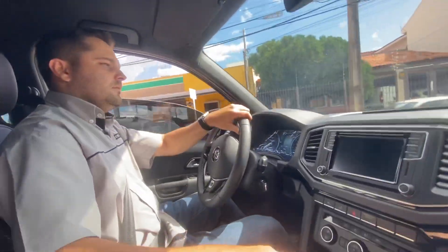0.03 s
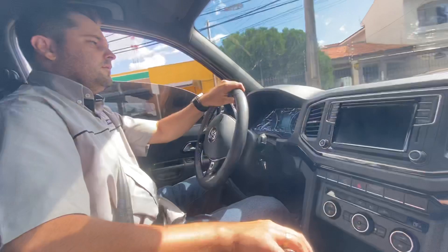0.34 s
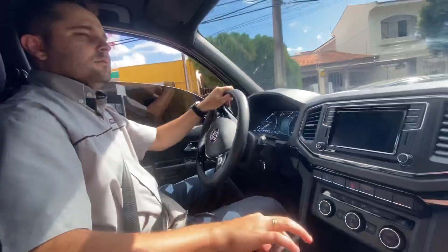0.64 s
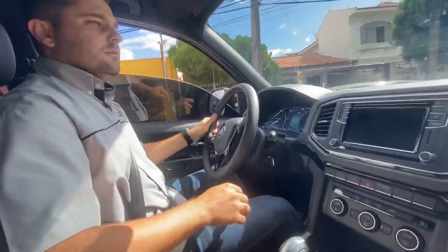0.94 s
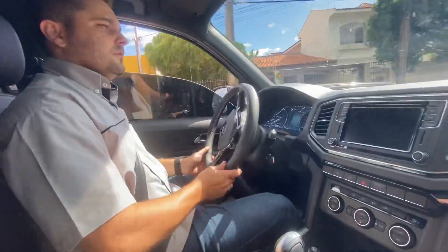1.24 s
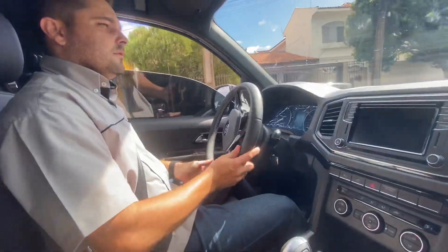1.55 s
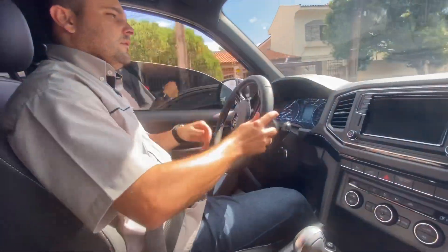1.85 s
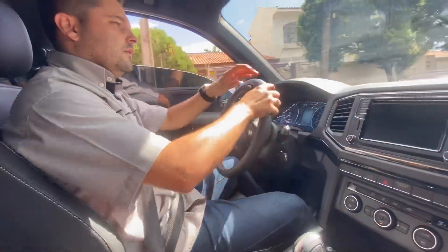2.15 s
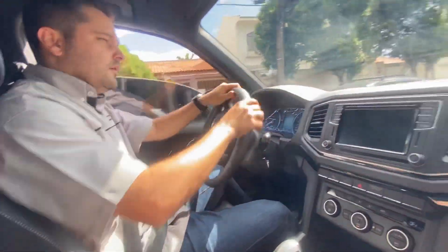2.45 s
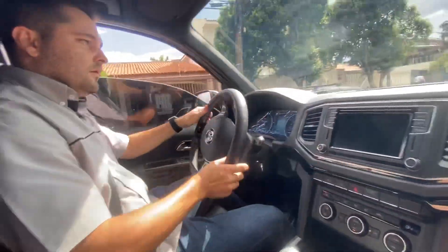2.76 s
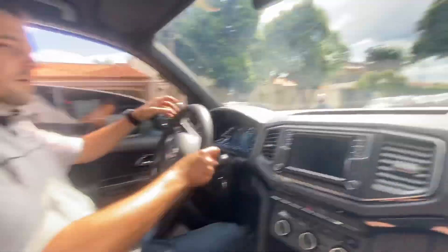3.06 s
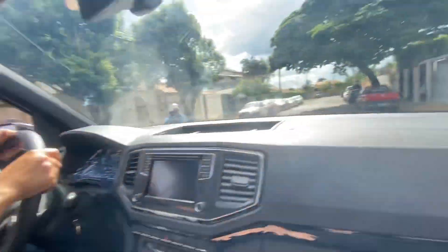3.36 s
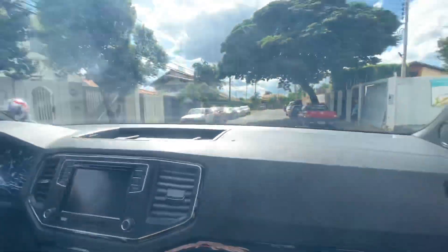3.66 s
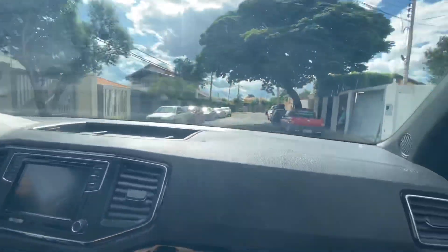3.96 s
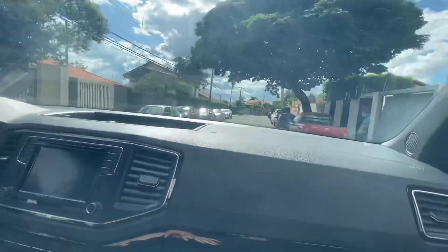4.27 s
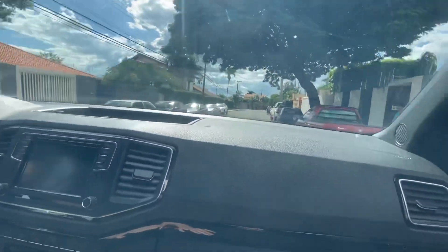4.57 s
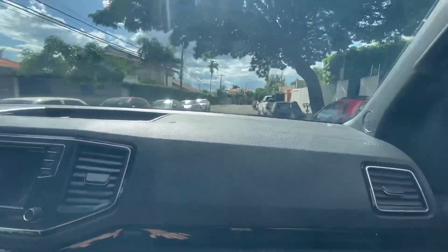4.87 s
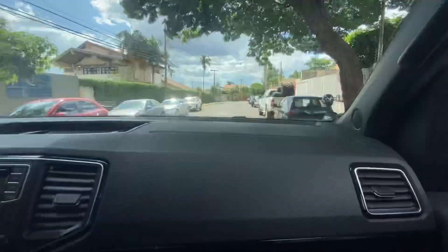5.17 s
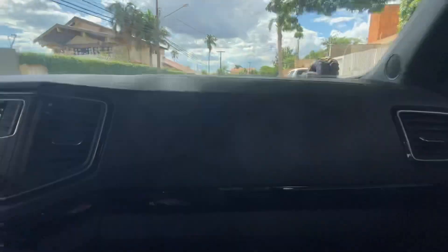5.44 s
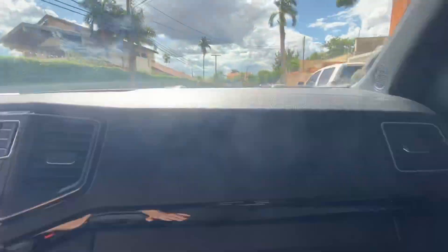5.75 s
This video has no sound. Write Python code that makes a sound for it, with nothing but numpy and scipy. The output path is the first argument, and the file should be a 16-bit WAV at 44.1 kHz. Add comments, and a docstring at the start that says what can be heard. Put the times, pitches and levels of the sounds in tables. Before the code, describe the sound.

Inside a pickup's cab, a diesel engine idles with a low hum and rumble under the steady rush of air vents. Light trim clicks come in the first second or so, the gear lever clacks dryly at about 0.8 seconds, and very faint bird-like chirps follow until 1.4. From about 1.5 seconds the truck pulls away, the engine rising in pitch with diesel clatter and soft turbo hiss. The revs level briefly near 3 seconds, and something loose knocks once at 3.1. From 3.5 the engine pulls hard, with a deep boom in the cab, a raspy exhaust and a growing, wavering roar; a high turbo whoosh glides upward around 4 seconds. It is loudest from 4.5 to 5.3, with a thin whistle and hiss just after 5. Then the throttle lifts, and the engine falls in pitch and softens, still booming at 6 seconds.

```python
"""A low rumble and the hum of an idling V6 diesel, heard inside a pickup with its air vents blowing.
Trim clicks, the gear lever clacks and faint chirps pass; then the truck pulls away, revs out and eases off.
The engine's firings boom in the cab, rasp down the open exhaust and clatter in the engine block.
As it works harder a wavering roar grows and the turbo hisses. Something loose knocks in a turn,
and a thin whistle sounds at the top of the revs."""
import sys
import numpy as np
from scipy import signal
from scipy.fft import rfft, irfft
from scipy.io import wavfile
from scipy.ndimage import uniform_filter1d

SR = 44100
rng = np.random.default_rng(int(sys.argv[2]) if len(sys.argv) > 2 else 0)


def master_out(mix):
    """Clip the mix to full scale and print it as 16-bit PCM to the path in sys.argv[1]."""
    frames = np.transpose(np.atleast_2d(mix))
    ceiling = np.clip(frames, -1, 1)
    pcm = np.round(ceiling * 32767).astype(np.int16)
    wavfile.write(sys.argv[1], SR, pcm)


N = 265041
TIME = np.arange(N) / SR

# Levels are relative: the functions add gains of their own. "Lead" is how far left runs ahead of right.
# road and body rumble over time: t/s, level/dB
RUMBLE_LEVEL = [(0, -35), (1.44, -34), (1.68, -33.5), (1.94, -30.5), (3.3, -31.5), (3.75, -26),
                (4.1, -28.5), (4.75, -22), (5.18, -24.5), (5.35, -26), (6.01, -26)]
# tone colour of the rumble: f/Hz, level/dB
RUMBLE_SPECTRUM = [(15, -40), (31, -9.5), (44, -2), (75, -5), (120, -7.5), (190, -14), (260, -20.5),
                   (450, -28), (600, -43), (1500, -44.5), (6000, -100)]
# firings per second, from idle to top revs and down again: t/s, f/Hz
FIRING_RATE = [(1.0, 43.21), (1.25, 45.31), (1.56, 50.63), (1.95, 71), (2.07, 74.8), (2.14, 80.64),
               (2.47, 84.92), (2.69, 93.45), (3.1, 90.78), (3.52, 105.3), (3.57, 110.1), (3.8, 114.3),
               (4.33, 151.9), (4.52, 165.5), (5.0, 189.7), (5.27, 196.4), (5.45, 183.9), (5.85, 138.7),
               (6.01, 133.8)]
# two dabs of throttle, an easy turn, full throttle, foot off: t/s, rasp level/dB, clatter level/dB
ENGINE_LOAD = [(0, -57, -58), (1.5, -50, -56.5), (1.7, -44.5, -45.5), (1.88, -38, -39.5), (1.955, -36, -35),
               (2.03, -38, -37.5), (2.14, -42, -35), (2.31, -36.5, -39), (2.37, -40, -33.5),
               (2.45, -34.5, -34.5), (2.75, -34.5, -43.5), (3.08, -35, -45), (3.45, -31, -40.5),
               (3.8, -32, -42), (4.22, -27.5, -39.5), (4.57, -23.5, -26.5), (4.9, -23.5, -29),
               (5.08, -22, -26.5), (5.29, -23, -27), (5.42, -30.5, -39), (6.01, -31.5, -44)]
# the six cylinders in the order they fire: level/dB, lateness/firing periods
CYLINDERS = [(0, 0), (-0.5, .08), (-0.5, -.05), (1.5, .02), (-0.5, -0.0212), (1, -.02)]
# the boom's four tones; an "order" is a multiple of the firing rate
BOOM_ORDERS = (1, 1.5, 2, 3)
# the boom's lowest tone: t/s, level/dB
BOOM_LEVEL = [(0, -35), (1.5, -34), (2.2, -29), (2.76, -24.5), (3.07, -30.5), (3.65, -19), (4.15, -18),
              (4.42, -17), (4.58, -13.5), (5.24, -14), (5.55, -15), (5.62, -30.5), (5.76, -31.5),
              (5.95, -15.5)]
# its three higher tones at cruising load: level/dB
OVERTONE_LEVELS = [-38, -36, -38]
# pitches at which the cab rings, one list per boom tone: f/Hz, width/Hz, lift/dB
CAB_RESONANCES = [
    [(58.2, 4.7, 10.5), (69, 2.3, 9.5), (100.9, 6.47, 10), (107.2, 2.6, -6), (150.6, 8.7, 6.5)],
    [(100, 7.1, 8), (145.8, 16, 14), (188.77, 18.2, 17.5)],
    [(98.8, 8.7, 20), (133, 12, 12), (187.2, 16.4, 12), (232.4, 6.4, 15), (266.8, 5.78, 14),
     (283.1, 7.8, 18.5), (313, 10, 10.5), (335.4, 13.8, 11.5), (396.3, 11.05, 13)],
    [(129.6, 3.8, 11.5), (264.7, 7.5, 17.5), (297, 24, 7), (355, 10, 1), (483.5, 30, 12), (528.7, 11.9, 13),
     (572, 19, 7.5)],
]
# standing waves make left and right differ: f/Hz, lead/rad, left minus right/dB
STANDING_WAVES = [(50, -0.8, -1.5), (92, 0, -3.5), (143, 0.92, 1), (159, 1.5, -5), (169.95, 0.5, -9),
                  (195, 0.56, -8), (248, 2, -4.5), (295, 0.5, -2), (343, -2.5, 0), (400, -1.5, -4.5),
                  (597.7, -2, -7.5)]
# cab resonances that hum at idle: f/Hz, level/dB
IDLE_RESONANCES = [(173, -33.5), (261, -51)]
# the order that drives each of them
IDLE_ORDERS = (4, 6)
# tone colour of the air vents: f/Hz, level/dB
FAN_SPECTRUM = [(150, -6), (300, -3), (460, 0.5), (620, -3), (800, -2), (1150, -4), (1450, -6.5),
                (1750, -13.5), (2400, -19), (3500, -24), (4500, -23.5), (5700, -22.5), (7200, -30),
                (15000, -53)]
# a dip in the sound that left and right share: f/Hz, level/dB
CAB_HOLLOW = [(540, 0), (600, -9), (650, -8), (720, 0)]
# burning fuel, heard through the cab's front wall: f/Hz, level/dB
BURN_SPECTRUM = [(300, -5.5), (430, 3), (530, 5), (640, -18.5), (900, -1), (1150, -1.5), (1330, -1),
                 (1500, -2), (1750, -3), (2400, -7), (3250, -13), (4100, -17.5), (6000, -29),
                 (10000, -32.5), (13000, -51)]
# the hard ring of the engine block: f/Hz, level/dB
KNOCK_SPECTRUM = [(400, -14), (700, -5), (950, 2), (1200, -5), (1400, 5), (1650, -3.5), (2000, -5),
                  (2350, -8.5), (2750, -3.5), (3300, -6), (3900, -21.5), (6000, -30), (12000, -48)]
# an exhaust pulse as it reaches the cab: f/Hz, level/dB
RASP_SPECTRUM = [(30, -31), (140, 7), (230, -2), (330, -1), (430, -2.5), (520, 3.5), (620, 2), (770, 1.5),
                 (925, -9), (1050, -2), (1280, -16), (1510, -15), (1800, -16), (2800, -17), (6000, -81),
                 (12000, -102)]
# how the exhaust sound differs between the sides: f/Hz, lead/rad
EXHAUST_LEAD = [(100, 0), (200, -.6), (380, -1.9), (700, -2.1), (1400, -2.5), (2500, -3.5)]
# droning cab panels: f/Hz, width/Hz, level/dB relative to the rasp level
PANELS = [(264.7, 12.3, -5), (425.4, 38, -8), (697, 66, -9.5), (992, 68, -14)]
# tone colour of a high, airy hiss: f/Hz, level/dB
AIRY_HISS_SPECTRUM = [(2500, 0), (4500, -5.5), (6200, 0.5), (7500, -6.5), (10000, -4.5), (11000, -10),
                      (12000, -34.5), (16000, -14)]
# clicks of trim and controls: t/s, level/dB, f/Hz, width/Hz
CLICKS = [(0.376, -44.5, 4380, 3000), (.772, -38.5, 4700, 550), (1.172, -42.5, 4800, 1400),
          (2.118, -34.5, 6660, 1100), (3.289, -33, 3700, 1218)]
# the gear lever touches, clacks into gear and rattles to rest: t/s, level/dB
LEVER_BLOWS = [(.802, -8), (.8105, 1.5), (.822, -9), (.8426, -13), (.851, -7), (.875, -12), (.8905, -15)]
# how the lever rings: f/Hz, width/Hz, level/dB, decay/s
LEVER_BANDS = [(1720, 430, -33, 0.0093), (3000, 1900, -42, 0.014), (7100, 3600, -43, 0.0098),
               (12500, 5000, -56, .005)]
# faint chirps, one list per note: t/s, f/Hz, level/dB
CHIRPS = [
    [(.905, 3750, -62), (.93, 4130, -62), (.97, 4494, -70)],
    [(.98, 4200, -60), (1.025, 4220, -63), (1.065, 4700, -69), (1.108, 5500, -56), (1.16, 4750, -67),
     (1.215, 4220, -66), (1.27, 4620, -72), (1.325, 4120, -65)],
    [(1.34, 5950, -66), (1.36, 5650, -66), (1.39, 5430, -66)],
]
# the turbo's highest hiss: t/s, level/dB
SIZZLE_LEVEL = [(1.6, -74), (2.0, -63), (2.55, -60), (2.9, -67), (3.45, -50), (4.25, -63), (4.6, -56),
                (5.2, -59), (5.6, -65), (6.01, -52)]
# strength of the roar's tones by pitch: f/Hz, level/dB
ROAR_SPECTRUM = [(300, -3), (380, -0.5), (520, -6.5), (670, -1), (790, -3), (900, -8), (1050, -2.5),
                 (1220, -6), (1350, -9.5), (1520, -5), (1800, -11.5), (2100, -11), (2700, -23)]
# turbo whooshes: t/s, half length/s, f/Hz, glide/(Hz per s), half width/Hz, level/dB
WHOOSHES = [(2.053, 0.12, 6620, 1, 218, -46), (2.527, 0.2, 6600, -2, 220, -50.5),
            (3.944, .1, 9860, 4197.5, 432.8, -33.5), (5.2, .13, 5660, -2, 1100, -42)]
# how the loose object rings: f/Hz, width/Hz, level/dB, decay/s
THUD_BANDS = [(354, 144, -27, 0.041), (940, 430, -24, 0.017), (1690, 1100, -29, 0.017),
              (3600, 3000, -38, 0.02)]
# brief dips in the boom at high revs: t/s, level change/dB
BOOM_DIPS = [(3.78, -4), (4.13, 0.5), (4.51, -11), (4.62, -1.5), (4.77, -14), (4.89, -4.5), (5.02, -2),
             (5.14, -2), (5.29, -4), (5.41, -12.5)]
# the whistle at top revs: t/s, level/dB
WHISTLE_LEVEL = [(4.98, -80), (5.04, -45), (5.1, -38), (5.17, -49), (5.26, -51), (5.36, -80)]


def gain(db):
    """Turn decibels into a number to multiply by."""
    return 10 ** (np.asarray(db) / 20)


def curves(table):
    """Each column of a time table, joined by straight lines."""
    times, *columns = np.transpose(table)
    return [np.interp(TIME, times, column) for column in columns]


def across(table):
    """Read a table of f/Hz, value at every frequency of the spectrum."""
    hz, value = np.transpose(table)
    bin_hz = np.arange(N // 2 + 1) * SR / N
    return np.interp(np.log(bin_hz + 1), np.log(hz), value)


def unit(x):
    """Scale a signal to an average strength (rms) of 1."""
    return x / np.sqrt(np.mean(x ** 2))


def colour(x, spectrum):
    """Give a sound the tone colour in a table, at strength 1."""
    return unit(irfft(rfft(x) * gain(across(spectrum)), N))


def noise():
    """Separate white noise for left and right."""
    return rng.standard_normal((2, N))


def wobble(rate):
    """A smooth random wobble of strength 1 that turns about `rate` times a second."""
    step = int(SR / rate)
    held = np.repeat(rng.standard_normal(N // step + 1), step)[:N]
    return unit(uniform_filter1d(uniform_filter1d(held, step), step))


def opposite(x):
    """Plus on the left, minus on the right."""
    return np.vstack([x, -x])


def pan(db):
    """Two gains that put the left side `db` above the right."""
    return gain(opposite(db) / 2)


def rumble():
    """Road and body rumble, nearly alike on both sides."""
    shared, side = colour(noise(), RUMBLE_SPECTRUM)
    return (shared + gain(-16) * opposite(side)) * gain(curves(RUMBLE_LEVEL)[0] + 1) * pan(-3.5)


def boom(turns, hz, load_db, cruise_db=-22, waver_rad=.12):
    """The engine's lowest tones waver, and swell as they pass a pitch at which the cab rings."""
    slowing = uniform_filter1d(np.maximum(-np.gradient(hz) * SR, 0), SR // 10)  # Hz per s
    effort_db = .25 * (load_db - cruise_db)
    # no two firings push equally hard
    levels = [curves(BOOM_LEVEL)[0] + throb() + .5 * wobble(24.55) + .9 * wobble(50)]
    levels += [db + effort_db + 2 * wobble(20) for db in OVERTONE_LEVELS]
    wave_hz, wave_lead, wave_db = np.transpose(STANDING_WAVES)
    out = 0
    for order, db, resonances in zip(BOOM_ORDERS, levels, CAB_RESONANCES):
        pitch = order * hz
        lift_db = sum(lift * np.exp(-((pitch - f) / width) ** 2) for f, width, lift in resonances)
        fade_db = .07 * slowing * (order - 1)  # higher tones fade most as the engine slows
        lead = np.interp(pitch, wave_hz, wave_lead)
        balance_db = np.interp(pitch, wave_hz, wave_db)
        phase = order * (2 * np.pi * turns + waver_rad * wobble(22))
        tone = np.sqrt(2) * np.sin(phase + opposite(lead) / 2) / np.cos(lead / 2)
        out += tone * gain(db + lift_db - fade_db) * pan(balance_db)
    return out


def idle_hum(turns, hz, half_width_hz=14):
    """At idle two higher engine tones match pitches at which the cab rings, so it hums."""
    out = 0
    for order, (cab_hz, db) in zip(IDLE_ORDERS, IDLE_RESONANCES):
        mistuning = (order * hz - cab_hz) / half_width_hz
        out += gain(db) * np.sin(2 * np.pi * order * turns) / (1 + mistuning ** 2)
    return out


def fan(db=-45):
    """The steady rush of the dashboard vents, made hollow by the cab."""
    shared, side = colour(noise(), FAN_SPECTRUM)
    return (colour(shared, CAB_HOLLOW) + opposite(side)) / np.sqrt(2) * gain(db) * pan(2.5)


def pulse_train(turns, jitter, scatter_db):
    """One click per firing; its timing and strength vary by cylinder and by chance."""
    firing = np.arange(1, int(turns[-1]))
    time_chance, size_chance = rng.standard_normal((N // 50, 2))[firing].T
    strength_db, late = np.array(CYLINDERS)[firing % len(CYLINDERS)].T
    at = np.interp(firing + late + jitter * time_chance, turns, np.arange(N)).astype(int)
    return np.bincount(at, gain(strength_db + scatter_db * size_chance), N)


def firing_sizes(turns, scatter_db):
    """Strength of the current firing: the cylinders differ, and no two burns are alike."""
    firing = turns.astype(int)
    strength_db = np.array(CYLINDERS)[firing % len(CYLINDERS), 0]
    return gain(strength_db + scatter_db * rng.standard_normal(N // 50)[firing])


def cab_echoes(x, ring_s):
    """Quick echoes from glass and trim, different on each side; they fall 60 dB in `ring_s`."""
    t = TIME[:SR // 8]
    echoes = rng.standard_normal((2, len(t))) * np.exp(-np.log(1000) * t / ring_s)
    echoes /= np.sqrt(np.sum(echoes ** 2, axis=1, keepdims=True))
    return signal.fftconvolve(np.atleast_2d(x), echoes, axes=1)[:, :N]


def shifting_echoes(x, ring_s, drift, rate):
    """As the listening spot moves, two sets of echoes blend, so single tones swell and break up."""
    angle = drift * wobble(rate)
    return np.cos(angle) * cab_echoes(x, ring_s) + np.sin(angle) * cab_echoes(x, ring_s)


def clatter(turns, hz, db, soften_above_hz=80):
    """Diesel knock: each firing strikes the block, which rings briefly over the noise of burning fuel."""
    strikes = pulse_train(turns, jitter=.06, scatter_db=3)
    knock = colour(shifting_echoes(strikes, ring_s=.07, drift=1.5, rate=30), KNOCK_SPECTRUM)
    knock_db = .5 - 3.5 * np.maximum(np.log2(hz / soften_above_hz), 0)
    burn = colour(firing_sizes(turns, scatter_db=1) * noise(), BURN_SPECTRUM)
    return (gain(3.5) * burn + gain(knock_db) * knock) * gain(db) * pan(2.5)


def rasp(turns, db, full_load_db=-23):
    """Each firing sends a pulse and a puff of gas down the pipe; the pulses stand out more under load."""
    pulses = colour(pulse_train(turns, jitter=.085, scatter_db=3.5), RASP_SPECTRUM)
    puffs = unit(np.exp(-(turns % 1) / 2.2) * firing_sizes(turns, scatter_db=4))
    gas = colour(puffs * noise()[0], RASP_SPECTRUM)
    pipe = gain(.2 * (db - full_load_db)) * pulses + gain(-5) * gas
    direct = irfft(rfft(pipe) * np.exp(.5j * opposite(across(EXHAUST_LEAD))), N)
    echoes = .7 * shifting_echoes(pipe, ring_s=.08, drift=1.2, rate=10)
    return unit(direct + echoes) * gain(db - .5) * pan(-4.5)


def engine_shake(turns, db):
    """The engine shakes on its mounts twice per crank turn (three firings), with a rough growl."""
    shake = np.sin(2 * np.pi * turns * 2 / 3) * (1 + .4 * wobble(12))
    growl = colour(noise()[0], [(60, -38), (105, 11), (140, 5), (230, -7.5), (350, -3), (1000, -91)])
    return (shake + growl) * gain(db - 2) * pan(-2)


def panels(db, limit_db=-33.5):
    """The shaking sets cab panels droning unevenly, each at its own pitch whatever the revs."""
    out = 0
    for hz, width, panel_db in PANELS:
        shiver = signal.sosfilt(signal.butter(2, width / 2, fs=SR, output="sos"), noise())
        lead = np.interp(hz, *np.transpose(EXHAUST_LEAD))
        phase = 2 * np.pi * hz * TIME + opposite(lead) / 2
        out += gain(panel_db) * unit(shiver[0] * np.cos(phase) + shiver[1] * np.sin(phase))
    return out * gain(np.minimum(db, limit_db)) * pan(-1.5)


def intake(octaves, clatter_db, boost_s=1.62, foot_off_s=5.28):
    """Air rushes into the engine, louder with revs, fuel and the turbo's push (its boost)."""
    off_boost = np.clip(1 - (TIME - boost_s) / .28, 0, 1)
    sag = np.clip((TIME - foot_off_s) / .22, 0, 1)
    db = -29.5 + 4 * octaves + .2142 * clatter_db - 10.5 * off_boost - 1.5 * sag
    return colour(noise(), AIRY_HISS_SPECTRUM) * gain(db + wobble(42)) * pan(2)


def strike(blows, bands, rise_s):
    """Blows on a loose part: each is a short burst of noise in the bands where the part rings."""
    out = 0
    for hz, width, band_db, decay_s in bands:
        low = np.hypot(hz, width / 2) - width / 2
        band = signal.butter(2, [low, min(low + width, .45 * SR)], "bandpass", fs=SR, output="sos")
        envelope = 0
        for start_s, db in blows:
            age = np.clip(TIME - start_s, 0, 1)
            envelope += gain(db) * (1 - np.exp(-age / rise_s)) * np.exp(-age / decay_s)
        out += gain(band_db) * envelope * unit(signal.sosfilt(band, noise()))
    return out


def clicks(band_db=1, decay_s=.011):
    """Small single clicks of trim and controls."""
    return sum(strike([(s, db)], [(hz, width, band_db, decay_s)], rise_s=.0021)
               for s, db, hz, width in CLICKS)


def gear_lever():
    """Each blow of the lever is a short, dry clack."""
    return strike(LEVER_BLOWS, LEVER_BANDS, rise_s=.0012)


def chirps():
    """A few faint, bird-like gliding notes before the truck pulls away."""
    out = 0
    for note in CHIRPS:
        hz, db = curves(note)
        sounding = (TIME > note[0][0]) & (TIME < note[-1][0])
        envelope = uniform_filter1d(sounding.astype(float), SR // 100)
        pitch = hz * (1 + .003 * wobble(200))
        out += envelope * gain(db) * np.sin(2 * np.pi * np.cumsum(pitch) / SR)
    return out


def sizzle():
    """A thin, very high hiss while the turbo pushes; it reaches the right side an instant later."""
    hiss = colour(noise()[0], [(11000, -44), (13400, 3), (14700, -5), (16500, -44)])
    return np.array([hiss, np.roll(hiss, 1)]) * gain(curves(SIZZLE_LEVEL)[0])


def roar(turns, hz, db, full_load_db=-23, swell_db=5.5, wander_hz=17):
    """Under load the engine's higher tones each wander, swell and fade, making a lumpy growl."""
    out = 0
    for order in np.arange(3.5, 14.5, .5):
        tone_db = np.interp(order * hz, *np.transpose(ROAR_SPECTRUM))
        tone_db += swell_db * np.minimum(wobble(18), 1.3)
        phase = 2 * np.pi * (order * turns + np.cumsum(wander_hz * wobble(55)) / SR)
        lead = np.interp(order * hz, *np.transpose(EXHAUST_LEAD)) + .5 * wobble(18)
        out += gain(tone_db) * np.sin(phase + opposite(lead) / 2)
    surge_db = 1.5 * wobble(11)
    effort_db = .54 * (db - full_load_db)
    return out * gain(db - 2 + surge_db + effort_db) * pan(-1)


def turbo(spread=.53):
    """Each whoosh is a band of hiss that swells and fades; one glides up as the turbo gathers speed."""
    out = 0
    for peak_s, half_s, hz, glide, half_width_hz, db in WHOOSHES:
        lowpass = signal.butter(3, half_width_hz, fs=SR, output="sos")
        low_noise = signal.sosfilt(lowpass, noise() + 1j * noise())
        pitch = hz + glide * (TIME - peak_s)
        hiss = np.real(low_noise * np.exp(2j * np.pi * np.cumsum(pitch) / SR))  # moved up to the pitch
        out += unit(hiss) * gain(db) / np.cosh((TIME - peak_s) / half_s) ** 2
    shared, side = out
    return (shared + spread * opposite(side)) / np.hypot(1, spread) * pan(-3)


def thud(touch_s=3.113, blow_s=3.127):
    """Something loose shifts in the turn: a light touch, then the blow."""
    return strike([(touch_s, -3.5), (blow_s, 0)], THUD_BANDS, rise_s=.003)


def throb(dip_s=.024):
    """The boom's uneven beat at high revs, in dB: round tops and narrow dips."""
    return sum(db * np.exp(-((TIME - s) / dip_s) ** 2) for s, db in BOOM_DIPS)


def whistle(hz=5400):
    """A thin, unsteady whistle at the top of the revs that sinks into the hiss."""
    pitch = hz + 17 * wobble(160)
    sounding = (TIME > WHISTLE_LEVEL[0][0]) & (TIME < WHISTLE_LEVEL[-1][0])
    return sounding * gain(curves(WHISTLE_LEVEL)[0]) * np.sin(2 * np.pi * np.cumsum(pitch) / SR)


def scene():
    """Speed and load drive the engine's sounds; the turbo and the cab's own noises join them."""
    idling = TIME < FIRING_RATE[0][0]
    hz = curves(FIRING_RATE)[0] + .4 * wobble(4) * idling
    turns = np.cumsum(hz) / SR  # firings so far
    octaves = np.log2(hz / hz.max())  # 0 at top revs, negative below
    load_db, clatter_db = curves(ENGINE_LOAD)
    exhaust_db = load_db + 3 * octaves
    low_tones = boom(turns, hz, load_db) + idle_hum(turns, hz)
    exhaust = rasp(turns, exhaust_db) + roar(turns, hz, exhaust_db)
    engine = clatter(turns, hz, clatter_db) + engine_shake(turns, load_db) + panels(load_db)
    air = intake(octaves, clatter_db) + turbo() + sizzle() + whistle()
    cab = rumble() + fan() + clicks() + gear_lever() + thud() + chirps()
    return low_tones + exhaust + engine + air + cab


def record(dry, ceiling=.95, fade_s=.006, top_hz=15300):
    """Round off the highest peaks, fade both ends and cut the very top of the treble."""
    rounded = dry / (1 + (dry / ceiling) ** 6) ** (1 / 6)
    fade = np.clip(np.minimum(TIME, TIME[-1] - TIME) / fade_s, 0, 1)
    return signal.sosfilt(signal.ellip(10, .2, 90, top_hz, fs=SR, output="sos"), rounded * fade)


dry = scene()
out = record(dry)
master_out(out)
```